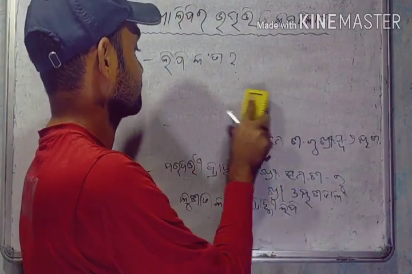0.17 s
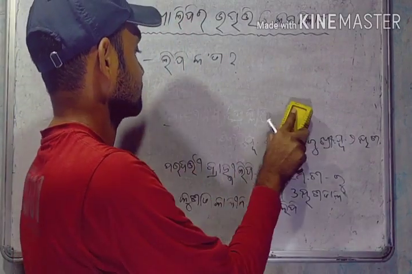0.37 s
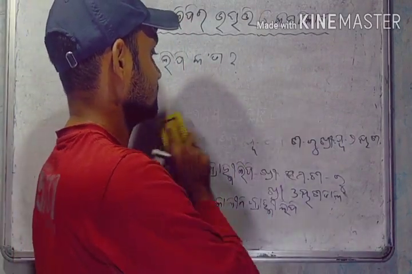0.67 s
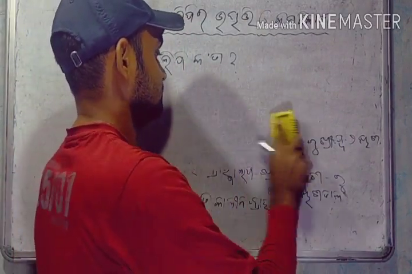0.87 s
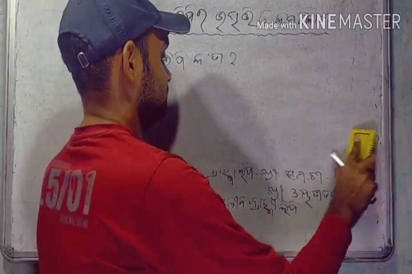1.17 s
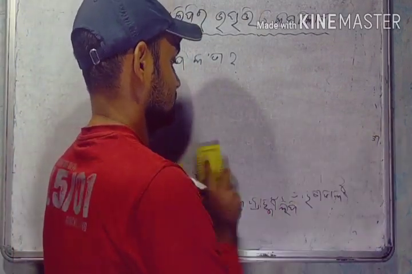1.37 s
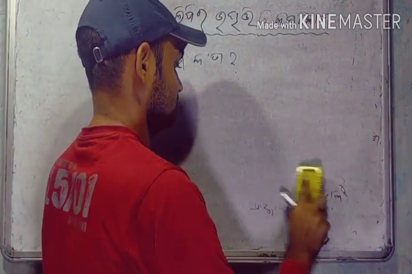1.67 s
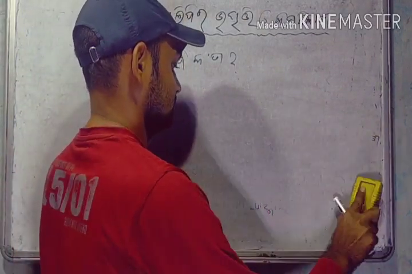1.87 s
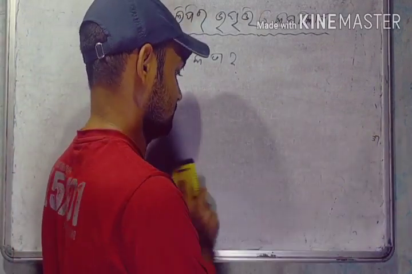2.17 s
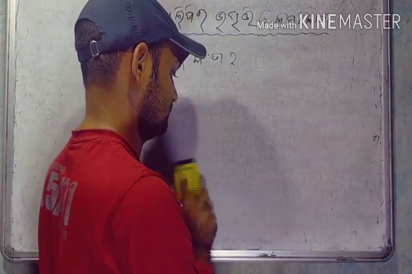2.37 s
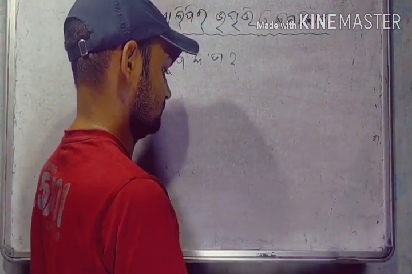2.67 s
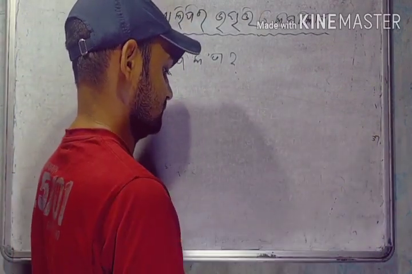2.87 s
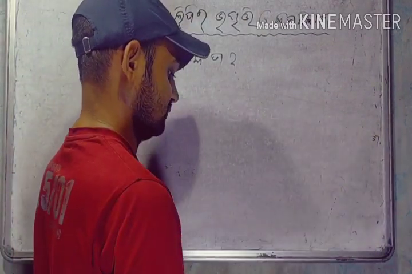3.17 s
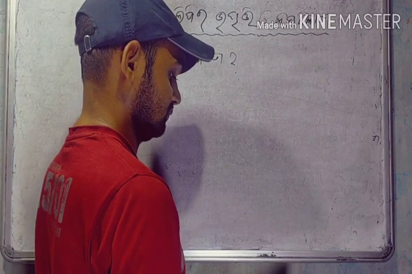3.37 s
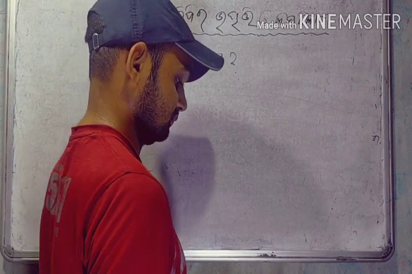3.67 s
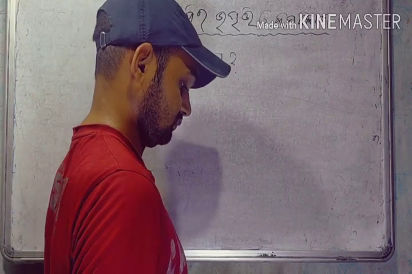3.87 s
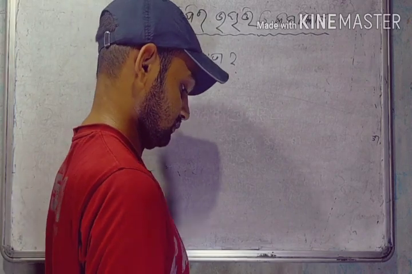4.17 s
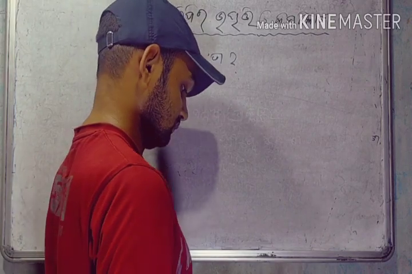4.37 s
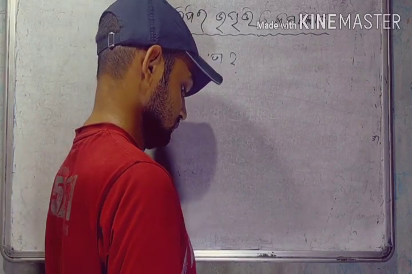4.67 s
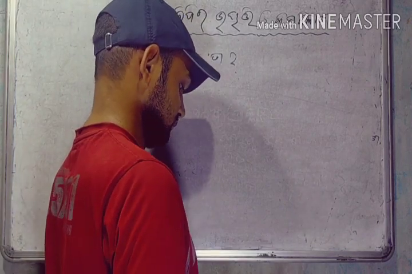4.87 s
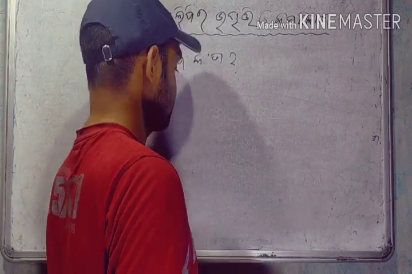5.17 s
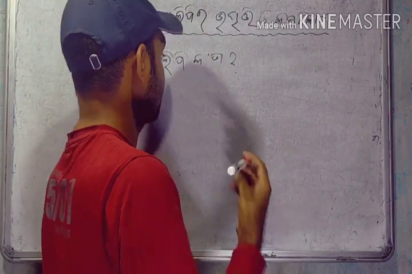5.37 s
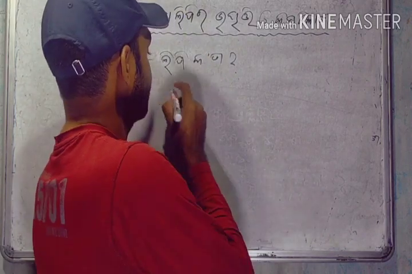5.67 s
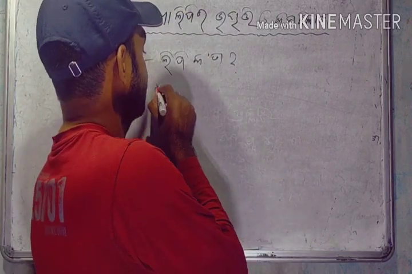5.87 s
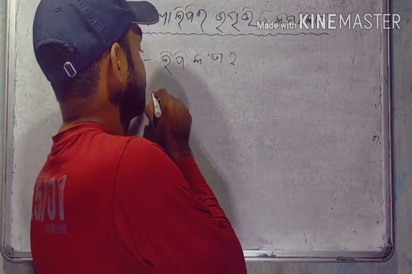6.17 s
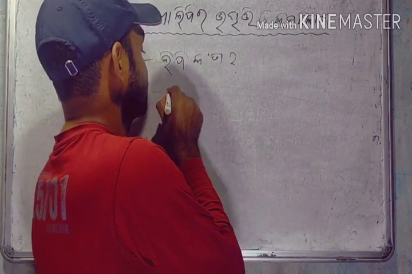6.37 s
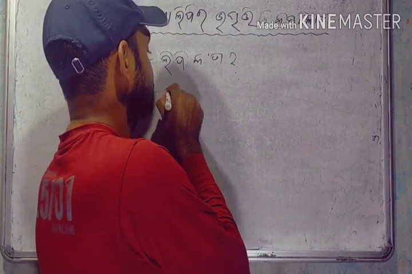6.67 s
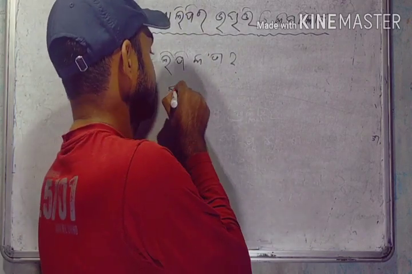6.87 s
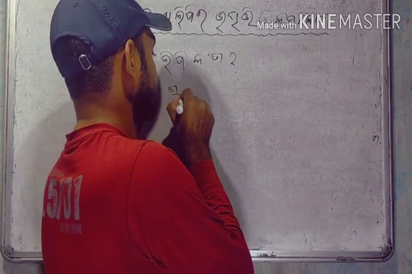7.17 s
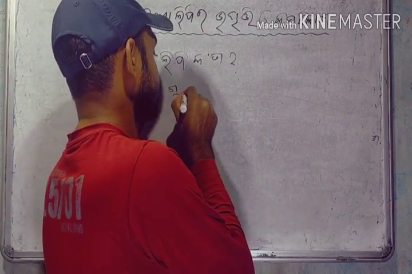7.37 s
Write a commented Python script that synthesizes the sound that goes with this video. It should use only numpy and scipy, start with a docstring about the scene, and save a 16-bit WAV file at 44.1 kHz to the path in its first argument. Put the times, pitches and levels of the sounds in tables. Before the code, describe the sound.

In a small hard room, a felt duster wipes a whiteboard in seven quick back-and-forth strokes, starting softly and growing brighter, with scratchy pressure, short squeaks and a low panel rumble. A sharp plastic clack lands mid-wiping, and a softer knock follows when the duster is put down. Afterwards only a wavering fan drone and airy rush remain, with very faint marker touches. One microphone, bright peaky treble, centred.

```python
"""In a small, hard room, a felt duster wipes a whiteboard in seven quick strokes and is put down.
A marker then touches the board. The felt's slipping fibres hiss, scratch under pressure and
sometimes squeak, and the panel rumbles; the duster's plastic shell knocks on a hard edge.
A five-bladed fan drones with wavering tones and rushes with shaped noise.
All of it reaches one microphone, with a bright, peaky treble."""
import sys
import numpy as np
from scipy import signal
from scipy.fft import rfft, irfft, next_fast_len
from scipy.io import wavfile

SR = 44100
rng = np.random.default_rng(int(sys.argv[2]) if len(sys.argv) > 2 else 0)


def store_wav(level_fs):
    """Save 16-bit WAV to argv[1]."""
    pcm = np.round(np.clip(np.atleast_2d(level_fs), -1, 1) * 32767)
    wavfile.write(sys.argv[1], SR, pcm.T.astype(np.int16))


N = 331509
TIME = np.arange(N) / SR  # s

# Strokes of the duster; the hand bears down once in each:
# (start t/s, end t/s, hiss level/dB, moment of the press t/s, its spread t/s,
#  its extra hiss level/dB, its scratch relative to the hiss level/dB, panel rumble level/dB)
STROKES = [ (-0.22, 0.394, -42, 0.35, 0.1, 4, -20, -41), (0.427, 0.712, -36.5, 0.67, 0.063, 3, -8, -36),
           (0.703, 1.145, -34, 0.76, 0.049, 10, -16, -35),
           (1.15, 1.56, -32.0, 1.466, 0.042, 4.5, -7, -31.5),
           (1.543, 1.9, -33.5, 1.597, 0.039, 12, -15, -34.5),
           (1.928, 2.353, -31.5, 2.266, 0.038, 5.5, -9.5, -32),
           (2.342, 2.65, -36.5, 2.458, 0.038, 10, -13, -35), ]
# Relative spectrum of the hissing felt: (f/Hz, level per Hz/dB)
FELT_SPECTRUM = [(2500, -36), (4200, -14.5), (6200, -13.5), (7300, -6), (8250, -0.5), (8550, 4.5),
                 (8950, -2.5), (9700, -6.5), (11000, -12), (12800, -8.5), (14200, -2.5), (15000, 4),
                 (15500, -1)]
# Relative spectrum of the scratching felt: (f/Hz, level per Hz/dB)
SCRATCH_SPECTRUM = [(2000, -2), (3000, 1.5), (4100, -8), (5100, 1.5), (5900, -3.5), (6700, 2), (8400, 3.5),
                    (10000, -2.5), (15000, -2.5)]
# Relative spectrum of the rumbling panel: (f/Hz, level per Hz/dB)
PANEL_SPECTRUM = [(60, -8), (120, 13.5), (250, 13), (500, 11), (900, 1.5), (1500, 0), (2200, -2.5),
                  (2900, -2), (3500, -3.5), (4300, -14), (6000, -13)]
# Fan speed: (t/s, blade-passing rate f/Hz)
BLADE_RATE = [(0, 70.44), (1.5, 70.92), (3.1, 71.1), (4.6, 70.97), (5.5, 70.28), (6.4, 71.1), (7.5, 72)]
# Swells and fades of the second blade harmonic, before trim and throb: (t/s, level/dB)
SECOND_HARMONIC = [(0.0, -41), (0.58, -24), (0.63, -30.5), (0.9, -22.5), (1.15, -40), (1.25, -28),
                   (2.01, -27.5), (2.05, -42), (2.09, -32), (2.62, -20), (3.12, -43), (3.16, -27.5),
                   (3.87, -31.5), (4.16, -22.5), (4.21, -35), (4.33, -23.5), (4.62, -31), (4.65, -23),
                   (5.02, -29.5), (5.23, -27), (5.55, -35), (5.61, -23), (6.64, -32.5), (6.93, -44),
                   (7.03, -25), (7.08, -45), (7.45, -31), (7.52, -41)]
# Swells and fades of the fourth blade harmonic, before trim and throb: (t/s, level/dB)
FOURTH_HARMONIC = [(0.0, -33), (0.92, -39.5), (0.98, -33.5), (2.24, -30), (2.32, -42), (2.36, -34),
                   (2.87, -29.5), (2.95, -48), (3.16, -35), (3.22, -46), (3.33, -32.5), (3.64, -36),
                   (5.67, -39.5), (5.72, -51), (5.76, -32.5), (6.13, -31), (6.49, -41.5), (7.52, -38)]
# The weaker fan tones: (multiple of the shaft rate, level/dB, unsteady share 0-1)
FAN_TONES = [(5.04, -63, 0.1), (7.03, -53, 0.57), (8.99, -39, 0.76), (12.7, -45.5, 0.85),
             (14.96, -40, 0.57), (18.94, -46.5, 0.83), (23.9, -49, 0.9), (24.78, -45, 0.99),
             (27.2, -55, 0.67), (29.92, -46, 0.56), (34.2, -51, 0.86), (37.48, -50, 0.88),
             (68, -54.5, 0.91)]
# The rush of air before the blades chop it: (t/s, level/dB)
AIR_LEVEL = [(0, -38.5), (1, -35), (2.8, -34.5), (3.6, -36), (5.5, -36), (6.3, -36.5), (7.5, -36)]
# Relative spectrum of the fan's rushing air: (f/Hz, level per Hz/dB)
AIR_SPECTRUM = [(380, -6), (530, -3), (650, -5), (1000, -8), (1500, -12), (2350, -15.5), (3500, -25),
                (4000, -32.5), (4900, -32), (6600, -36.5), (8450, -30.5), (10000, -40), (12500, -45),
                (15400, -37)]
# Relative spectrum of the fan's buffeting: (f/Hz, level per Hz/dB)
BUFFET_SPECTRUM = [(25, -34), (48, -39), (70, -20.5), (100, -17.5), (125, 5), (160, 0.5), (200, 0),
                   (235, -1), (280, 4), (330, -4.5), (390, -11), (480, -33)]
# Half-formed squeaks of the pressed pad, level before the fade in and out:
# (start t/s, length t/s, f/Hz, width f/Hz, level/dB)
SQUEAKS = [(0.59, 0.1, 6850, 600, -42.5), (.685, 0.086, 6600, 450, -48), (0.68, .08, 5700, 550, -45),
           (1.41, 0.08, 6600, 550, -37), (1.405, .08, 2450, 600, -37.5), (1.556, 0.087, 5600, 350, -39),
           (1.566, 0.087, 4600, 300, -46), (1.559, 0.053, 8300, 620, -30), (2.22, 0.076, 5700, 350, -42),
           (2.198, 0.09, 2850, 850, -34.5), (2.41, .06, 5500, 300, -42), (2.415, 0.054, 8100, 300, -32.5)]
# Knocks of the duster's shell, t60 being the time to fall 60 dB:
# (start t/s, clack level/dB, clack t60 t/s, shell ring level/dB, softness of contact t/s)
KNOCKS = [(1.713, -18.5, 0.036, -44, 0.00052), (1.7168, -25, 0.043, -41, .0005),
          (1.729, -30, 0.073, -38, .004), (3.130, -23.5, 0.092, -27, 0.016)]
# Relative spectrum of a knock, before softening: (f/Hz, level per Hz/dB)
KNOCK_SPECTRUM = [(100, -8), (400, 10), (1500, -2), (3000, -1), (4200, -5.5), (7000, -5), (8300, 7.5),
                  (10500, -14), (15300, -2)]
# Ringing tones of the shell, relative to its ring level: (f/Hz, level/dB, t60 t/s)
SHELL = [(1267, 5.5, 0.058), (1716, 8, 0.051), (2390, -9, .12), (3610, -5.5, 0.087)]
# Sleeve rustles and light touches of the marker: (start t/s, peak level/dB, length t/s)
TOUCHES = [(2.72, -56, 0.29), (3.13, -56, 0.36), (4.872, -54, 0.05), (5.01, -55, 0.16), (5.662, -53, 0.04),
           (5.7, -60, .09), (5.802, -53, .04), (6.598, -62, .1), (6.78, -60, .08), (7.145, -56, .08),
           (7.33, -57, .11)]
# Relative spectrum of the light touches: (f/Hz, level per Hz/dB)
TOUCH_SPECTRUM = [(2000, -25), (6000, -19), (8600, 6), (10500, -7), (13000, -6), (15300, 0.5)]

SWING_SHAPE = 0.74  # loudness follows the arm's speed, half a sine per stroke, to this power
GLIDE_SCRATCH_DB = -9  # scratch relative to the hiss while the pad only glides
PANEL_FOLLOWS = 0.43  # dB of rumble per dB of friction
BLADES = 5
THROB_PER_S, THROB_DB = 8.5, 2  # the drone's quick, uneven wavering
EDGE_HZ = 15700  # top of the sound's range


def amp(db):
    """Turns decibels into gain."""
    return 10 ** (np.asarray(db) / 20)


def unit(x):
    """Scales to an rms (average strength) of 1."""
    return x / np.sqrt(np.mean(abs(x) ** 2) + 1e-20)


def follow(rows):
    """Draws a table's curve at every sample."""
    s, value = np.transpose(rows)
    return np.interp(TIME, s, value)


def colour(x, points):
    """Gives x a spectrum that falls away beyond its end points; rms 1."""
    size = next_fast_len(len(x))
    f, db = np.transpose(points)
    log_f = np.log(f)
    log_hz = np.log(np.fft.rfftfreq(size, 1 / SR) + 1)
    beyond = abs(log_hz - np.clip(log_hz, log_f[0], log_f[-1]))
    gain = amp(np.interp(log_hz, log_f, db) - 20 * beyond)
    return unit(irfft(rfft(x, size) * gain, size)[:len(x)])


def drift(rate):
    """Smooth complex chance of rms 1, moving about rate times a second."""
    frames = np.linspace(0, N / SR, 4096)
    hz = np.fft.fftfreq(len(frames), frames[1])
    random_phase = np.exp(2j * np.pi * rng.random(len(hz)))
    wander = np.fft.ifft(random_phase / (1 + (hz / rate) ** 2))
    return unit(np.interp(TIME, frames, wander))


def grains(per_s, spread_db):
    """Tiny slips at random moments, of uneven size; rms 1."""
    size = amp(spread_db * np.minimum(rng.exponential(1, N), 4))
    happens = rng.random(N) < per_s / SR
    return unit(size * rng.standard_normal(N) * happens)


def add(mix, s, sound):
    """Mixes a sound in at time s."""
    part = mix[round(s * SR):][:len(sound)]
    part += sound[:len(part)]


def room(x, t60, wet_db):
    """Direct sound plus a short tail of dense reflections, starting 3 ms later."""
    t = TIME[:SR // 2]
    tail = rng.standard_normal(len(t)) * amp(-60 * t / t60) * (t > .003)
    reflections = signal.fftconvolve(x, unit(tail) / np.sqrt(len(t)))[:N]
    return x + amp(wet_db) * reflections


def stroke(start, end, hiss_db, press_s, spread_s, press_db, bite_db, panel_db):
    """Strength of hiss, scratch and rumble as the arm speeds up, bears down and slows to turn."""
    swing = np.clip((TIME - start) / (end - start), 0, 1)
    speed = np.maximum(np.sin(np.pi * swing), 0) ** SWING_SHAPE
    press = np.exp(-.5 * ((TIME - press_s) / spread_s) ** 2)
    friction = speed * amp(press_db * press)
    hiss = amp(hiss_db) * friction
    scratch = hiss * (amp(GLIDE_SCRATCH_DB) + amp(bite_db) * press)
    panel = amp(panel_db) * friction ** PANEL_FOLLOWS
    return np.array([hiss, scratch, panel])


def duster():
    """Felt fibres slip by the thousand; under pressure coarser slips scratch; the panel rumbles beneath."""
    hiss, scratch, panel = sum(stroke(*row) for row in STROKES)
    judder = amp(0.88 * drift(rate=40).real)  # the pad never slides quite evenly
    # the hiss gets 0.5 dB on top of its table level
    felt = hiss * amp(0.5) * colour(grains(per_s=26000, spread_db=-0.4), FELT_SPECTRUM)
    scrape = scratch * colour(grains(per_s=6000, spread_db=-2.0), SCRATCH_SPECTRUM)
    rumble = panel * colour(grains(per_s=5000, spread_db=-1.0), PANEL_SPECTRUM)
    return judder * (felt + scrape + rumble)


def fan_drone():
    """Two strong blade harmonics swell, fade and throb; weaker tones sway on multiples of the shaft rate."""
    blade = 2 * np.pi * np.cumsum(follow(BLADE_RATE)) / SR  # phase in radians
    throb = THROB_DB * drift(rate=THROB_PER_S)
    second_gain = amp(follow(SECOND_HARMONIC) - 1.2 + throb.real)
    fourth_gain = amp(follow(FOURTH_HARMONIC) - 0.93 + throb.imag)
    # each harmonic's phase also wanders a little
    out = second_gain * np.cos(2 * blade + 0.18 * drift(rate=3.5).real)
    out += fourth_gain * np.cos(4 * blade + 0.13 * drift(rate=4.0).real)
    for multiple, db, unsteady in FAN_TONES:
        sway = np.sqrt(1 - unsteady) + np.sqrt(unsteady) * drift(rate=3.6)
        phase = multiple * blade / BLADES + 2 * np.pi * rng.random()
        out += amp(db) * (sway * np.exp(1j * phase)).real
    return np.sqrt(2) * out  # a cosine's rms is 1/sqrt(2), so this makes the levels rms


def fan_air():
    """Low buffeting, a rush of air whose low part the blades chop, and a smooth hiss above."""
    blade = 2 * np.pi * np.cumsum(follow(BLADE_RATE)) / SR
    chop = 0.15 * np.cos(blade) + 0.19 * drift(rate=6.6).real
    # near walls leave a fine, fixed ripple in the colour of the rush
    near_walls = room(rng.standard_normal(N), t60=0.025, wet_db=-15)
    rush = amp(follow(AIR_LEVEL)) * colour(near_walls, AIR_SPECTRUM)
    lowpass = signal.butter(2, 2200, fs=SR, output="sos")
    chopped = rush + chop * signal.sosfiltfilt(lowpass, rush)
    buffet_gain = amp(-34.0 + 2.1 * drift(rate=1.6).real)
    return chopped + buffet_gain * colour(rng.standard_normal(N), BUFFET_SPECTRUM)


def squeaks():
    """The pad catches and sings briefly: noisy slips in one narrow resonance."""
    out = np.zeros(N)
    for s, length, hz, width, db in SQUEAKS:
        t = TIME[:round(length * SR)]
        pole = np.exp((2j * hz - width) * np.pi / SR)
        resonance = signal.lfilter([1], np.poly([pole, pole]), rng.standard_normal(SR // 4))
        ring = resonance.real[-len(t):]  # the end, where the ringing has built up
        add(out, s, amp(db) * unit(ring) * np.sin(np.pi * t / length))
    return out


def knocks():
    """The plastic shell strikes a hard edge: a quickly dying clack and a short ring."""
    out, t = np.zeros(N), TIME[:SR // 3]
    ring = sum(amp(db - 60 * t / t60) * np.sin(2 * np.pi * hz * t) for hz, db, t60 in SHELL)
    for s, db, t60, ring_db, soft in KNOCKS:
        # a soft contact builds more slowly and has less treble
        tone = [(hz, level - 10 * np.log10(1 + (hz * soft / 28) ** 2)) for hz, level in KNOCK_SPECTRUM]
        clack = amp(db - 60 * t / t60) * colour(rng.standard_normal(len(t)), tone)
        build_up = 1 - np.exp(-t / soft)
        add(out, s, (clack + amp(ring_db) * ring) * build_up)
    return out


def touches():
    """Thin brushes of sleeve and marker, quick to start and slower to fade."""
    contact = np.zeros(N)
    for s, db, length in TOUCHES:
        contact += amp(db) * np.interp(TIME, [s, s + .25 * length, s + length], [0, 1, 0])
    return contact * colour(grains(per_s=4500, spread_db=4.5), TOUCH_SPECTRUM)


def scene():
    """Everything reaches one microphone, sent alike to both ears."""
    board = duster() + squeaks() + knocks() + touches()
    mono = room(board, t60=0.13, wet_db=-10) + fan_drone() + fan_air()
    return np.array([mono, mono])


def record(dry):
    """Steeply cuts the treble above EDGE_HZ."""
    lowpass = signal.firwin(601, EDGE_HZ, window=("kaiser", 9), fs=SR)
    return signal.oaconvolve(dry, lowpass[None], "same")


dry = scene()
out = record(dry)
store_wav(out)
```